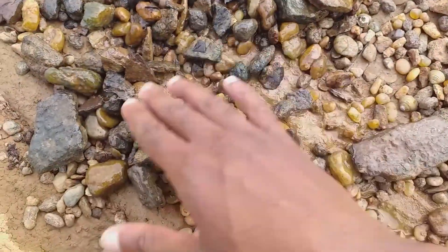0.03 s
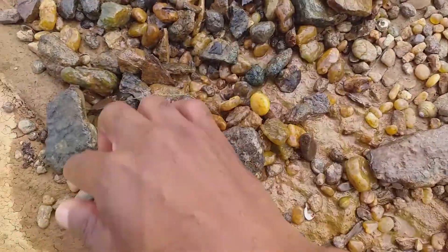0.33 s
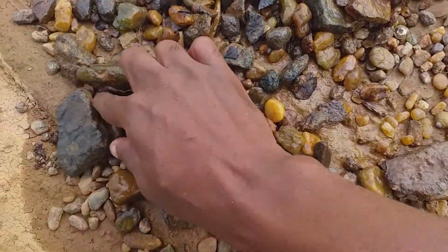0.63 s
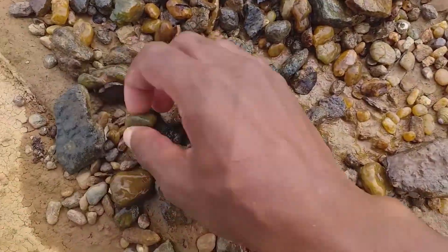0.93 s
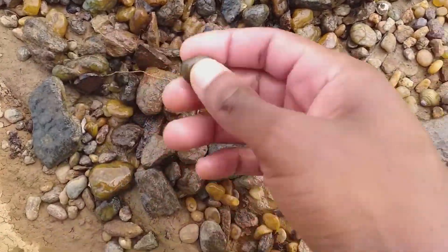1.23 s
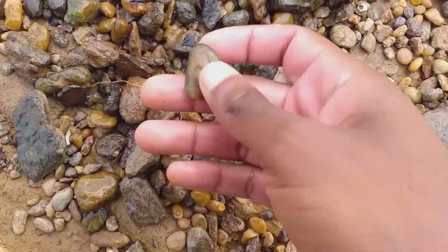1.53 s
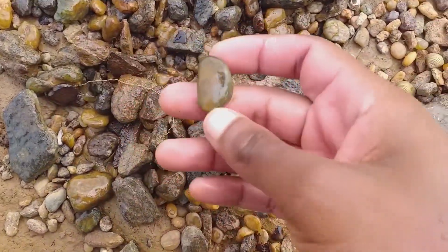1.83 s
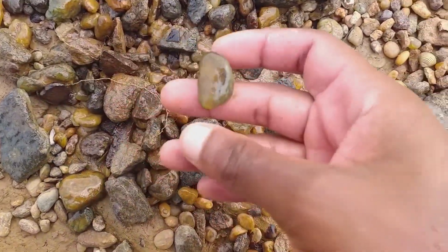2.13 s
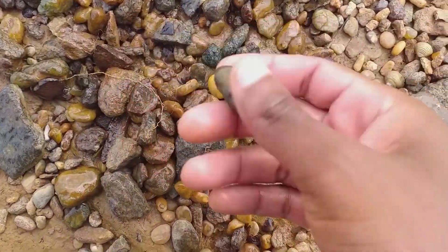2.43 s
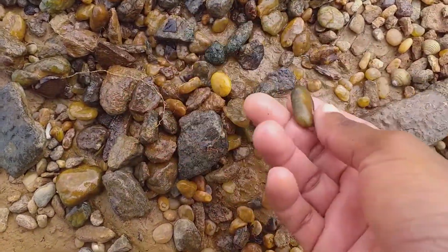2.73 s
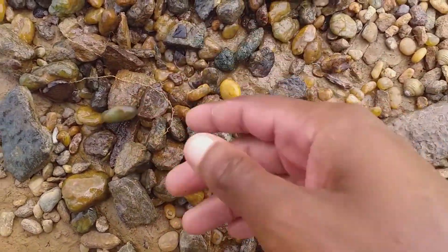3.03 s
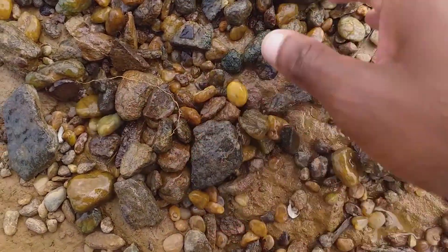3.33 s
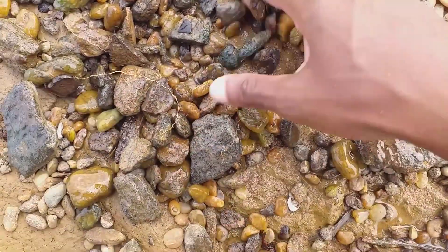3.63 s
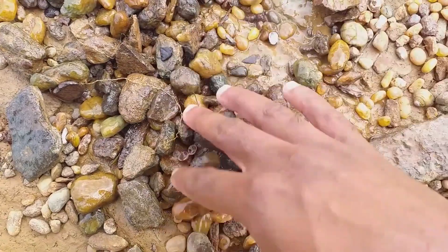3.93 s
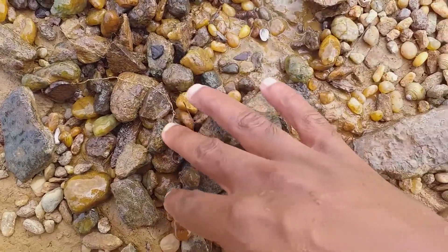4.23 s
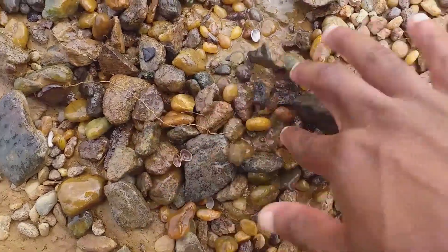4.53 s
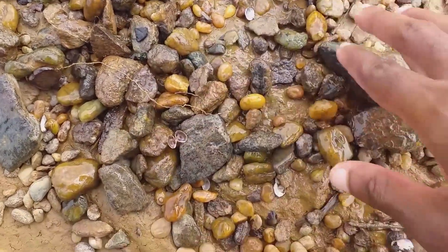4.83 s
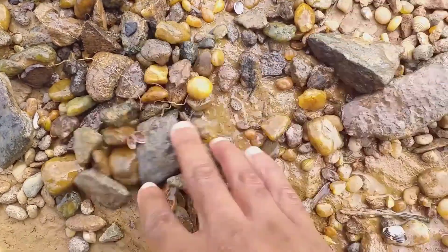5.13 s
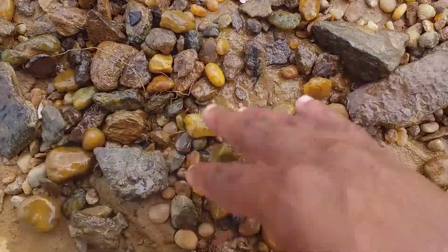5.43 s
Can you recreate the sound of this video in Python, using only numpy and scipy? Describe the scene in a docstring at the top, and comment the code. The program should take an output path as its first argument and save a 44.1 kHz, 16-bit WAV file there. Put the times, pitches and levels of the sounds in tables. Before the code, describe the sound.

Wet pebbles clack and crunch close by as a hand rakes through them in short bursts, with a faint river rushing behind.

```python
"""Wet pebbles clack and crunch close by as a hand rakes through them on a river bank.
The hand digs, picks one stone up, drops it and rakes three more times. Larger pebbles knock together
and tumble back, each with a very short, water-damped clack; grit crunches while the fingers push.
Under the stones sit soft thuds and wet rubs of the hand. Behind it all the river rushes steadily,
with a faint low hum far off."""
import sys
import numpy as np
from scipy import signal
from scipy.io import wavfile
from scipy.ndimage import uniform_filter1d

SR = 44100
rng = np.random.default_rng(int(sys.argv[2]) if len(sys.argv) > 2 else 0)


def generate_wav(signal):
    """Clip the signal to [-1, 1] and save it as 16-bit WAV at the path in sys.argv[1]."""
    frames = np.transpose(np.atleast_2d(signal))
    scaled = np.clip(frames, -1, 1) * 32767
    pcm = np.round(scaled).astype(np.int16)
    wavfile.write(sys.argv[1], SR, pcm)


N = 245637
HIT_SAMPLES = 2048
BODY_TOP_HZ, CRACK_LOW_HZ, TOP_HZ = 9000, 10000, 15900   # a hit has a body below and a crack on top


def from_db(db):
    return 10 ** (np.asarray(db) / 20)


def unit_rms(x):
    return x / np.sqrt(np.mean(x ** 2) + 1e-20)


def unit_energy(x):
    return x / np.sqrt(np.sum(x ** 2) + 1e-20)


def fader(points):
    """Gain at every sample from (time [s], level [dB]) points."""
    times, levels_db = np.transpose(points)
    return from_db(np.interp(np.arange(N) / SR, times, levels_db))


def db_at(spectrum, hz):
    """Read an EQ curve on a log-frequency axis."""
    freqs, levels_db = np.transpose(spectrum)
    return np.interp(np.log(hz), np.log(freqs), levels_db)


def butter(x, hz, kind, order=2):
    """A causal Butterworth filter."""
    sos = signal.butter(order, np.clip(hz, 10, .47 * SR), kind, fs=SR, output="sos")
    return signal.sosfilt(sos, x + 1e-18)


def drift(per_s):
    """A random modulator that glides between values of spread 1."""
    knots = rng.standard_normal(2048)
    return np.interp(np.arange(N) / SR * per_s, np.arange(len(knots)), knots)


def swells(rows):
    """An envelope of smooth, bell-shaped swells."""
    t = np.arange(N) / SR
    return sum(from_db(level_db) * np.exp(-((t - s) / half_s) ** 2) for s, half_s, level_db in rows)


def levelled(x, span_s=0.041):
    """Ride the gain so that the push sets the loudness and the grain stays."""
    power = np.maximum(uniform_filter1d(x ** 2, int(span_s * SR)), 0)
    return x / np.sqrt(power + .02 * np.mean(x ** 2))


def grains(per_s, spread_db=4):
    """Clicks at random moments: many small ones, a few large."""
    sizes = from_db(spread_db * np.minimum(rng.exponential(1, N), 4)) * rng.choice([-1, 1], N)
    return sizes * (rng.random(N) < per_s / SR)


def ring(hz, t60):
    """One struck mode dying away."""
    t = np.arange(HIT_SAMPLES) / SR
    return np.sin(2 * np.pi * hz * t) * from_db(-60 * t / t60)


def contact(scatter_db=-13, scatter_t60=0.029, far_db=-38, far_t60=0.0204):
    """One sharp impulse, then its dense scatter off the stones around and off the hand."""
    t = np.arange(HIT_SAMPLES) / SR
    fade = from_db(scatter_db - 60 * t / scatter_t60) + from_db(far_db - 60 * t / far_t60)
    pulse = fade * rng.standard_normal(HIT_SAMPLES)
    pulse[0] += 1
    return pulse


def crackle(per_s):
    """One contact sound, retriggered at random."""
    return signal.fftconvolve(grains(per_s), contact())[:N]


def far_hum(band_hz=(112, 124), level_db=-68):
    """A faint low hum far off, wavering as a narrow band of noise does."""
    return from_db(level_db) * unit_rms(butter(rng.standard_normal(N), band_hz, "band"))


# tone of the river: (frequency [Hz], relative density [dB])
RIVER_EQ = [(25, -33), (50, -19.5), (75, -14.5), (150, -5.5), (240, 0), (420, 0), (620, -6), (950, -4.5),
            (1500, -13), (2300, -15.5), (5000, -28), (8600, -56.5), (10000, -53), (16000, -35)]
# fader ride of the river: (time [s], level [dB])
RIVER_FADER = [(0, -46), (.75, -47.5), (1.35, -47), (1.6, -45.5), (2.0, -46.5), (2.8, -46), (5.57, -46)]
def river(swell_db=1.77, swells_per_s=12):
    """Far running water: a smooth rush whose third-octave bands each swell on their own."""
    edges_hz = 25 * 2 ** np.arange(0, 9.6, 1 / 3)
    white = rng.standard_normal((2, N))   # neighbouring bands take different noise
    rush = np.zeros(N)
    for k, (low, high) in enumerate(zip(edges_hz, edges_hz[1:])):
        band = butter(white[k % 2], [low, high], "band", order=3)
        rush += band * from_db(db_at(RIVER_EQ, np.sqrt(low * high)) + swell_db * drift(swells_per_s))
    return fader(RIVER_FADER) * unit_rms(rush)


# fader ride of the hiss off the palm: (time [s], level [dB])
PALM_FADER = [(0, -59), (1.1, -68), (1.5, -66), (2.0, -65), (2.9, -62.5), (3.3, -67), (5.57, -64.5)]
def palm_hiss(band_hz=(1600, 5000)):
    """The open palm throws back some of the river's hiss."""
    return fader(PALM_FADER) * unit_rms(butter(rng.standard_normal(N), band_hz, "band"))


# cues for the weight of the hand: (time [s], half-width [s], level [dB])
THUD_CUES = [(.3, .04, -64), (.5, 0.099, -59.5), (.95, 0.047, -58), (5.06, 0.068, -60)]
def hand_thuds(band_hz=(50, 100)):
    """The hand bears down on the bed with soft, low thuds."""
    return swells(THUD_CUES) * unit_rms(butter(rng.standard_normal(N), band_hz, "band"))


# cues for sliding skin: (time [s], half-width [s], level [dB])
RUB_CUES = [(.65, 0.3, -59), (1.72, .1, -79), (2.19, 0.033, -76), (2.5, 0.015, -68), (2.85, 0.086, -82.5),
            (4.34, 0.02, -54)]
def skin_rubs(band_hz=(5500, 9000), slips_per_s=700):
    """Wet skin slips over stone with a faint, bright crackle."""
    return swells(RUB_CUES) * unit_rms(butter(crackle(slips_per_s), band_hz, "band"))


# modes of a gripped stone: (frequency [Hz], relative level [dB], t60 [s])
GRIPPED_MODES = [(930, -4, 0.056), (1280, -1.5, 0.02), (1770, 3.5, 0.019), (2320, -8, 0.0084),
                 (4900, 2.5, 0.011)]
# cues for its taps: (time [s], gain [dB])
TAP_CUES = [(2.6475, -35.5), (4.528, -36)]
def held_stone(scuff_db=14, scuff_hz=(800, 5500)):
    """Dull taps of a stone in the fingers: a few skin-damped modes and a broad scuff."""
    modes = sum((-1) ** k * from_db(db) * ring(hz, t60) for k, (hz, db, t60) in enumerate(GRIPPED_MODES))
    out = np.zeros(N)
    for s, gain_db in TAP_CUES:
        at = round(s * SR)
        scuff = from_db(scuff_db) * unit_energy(butter(contact(), scuff_hz, "band"))
        out[at:at + HIT_SAMPLES] += from_db(gain_db) * (modes + scuff)
    return out


# bell filters of the microphone's tone: (centre [Hz], width [Hz], gain [dB])
MIC_EQ = [(1576, 350, 4), (2140, 250, -3.5), (2335, 220, 7.5), (2800, 430, 0.5), (3200, 210, 2.5),
          (5280, 61, 4), (8700, 460, -1.5)]
def mic_colour(x):
    """The microphone's tone colours the stones with a few narrow peaks and dips."""
    for hz, width_hz, gain_db in MIC_EQ:
        tuning = -2 * np.cos(2 * np.pi * hz / SR)
        half = np.pi * width_hz / SR
        lift = from_db(gain_db / 2)
        numerator = [1 + half * lift, tuning, 1 - half * lift]
        denominator = [1 + half / lift, tuning, 1 - half / lift]
        x = signal.lfilter(numerator, denominator, x)
    return x


def push_envelope(start, length, t60, attack_share=0.32):
    """Force builds up, holds to the end of the push, then the stones slide to rest."""
    t = np.arange(N) / SR - start
    attack = np.clip(t / (attack_share * length), 0, 1)
    return attack * from_db(-60 * np.maximum(t - length, 0) / t60)


# pushes of the fingers through the grit: (start [s], length [s], crunch level [dB], release t60 [s],
# crack re crunch [dB], send to the big stones [dB])
PUSH_CUES = [(0.06, .009, -31, .05, 5.5, -36), (0.079, .04, -27, .07, -9, -36),
             (0.456, 0.0188, -35, 0.029, -8, -32), (0.589, .025, -44, 0.17, -20, -25),
             (0.71, 0.096, -40.5, .1, -4, -28), (0.959, .02, -45.5, 0.056, 2, -30),
             (3.051, .03, -47, 0.57, -12, -32), (3.581, 0.18, -22.5, 0.68, -7, -20.5),
             (3.889, 0.044, -30, 0.2, -10, -21), (4.375, 0.074, -31.5, 0.53, -12.5, -18.5),
             (4.473, .05, -27.5, 0.51, -11, -20.5), (5.019, 0.038, -35.5, 0.087, -18, -25),
             (5.059, 0.059, -23.5, 0.45, -9, -25.5), (5.138, .052, -23.5, 0.11, -9, -29.5),
             (5.195, 0.055, -34, 0.042, 3.5, -26), (5.272, 0.033, -43.5, 0.069, -23, -32),
             (5.348, 0.031, -38, 0.066, -9, -29), (5.412, 0.014, -45, 0.035, -29, -22)]
def raking(creep_db=-26.5, creep_t60=0.88, creep_crack_db=-12):
    """Envelopes for crunch, crack and big stones; grit creeps on after each push, and all add in power."""
    power = np.zeros((3, N))
    for start, length, level_db, t60, crack_db, big_db in PUSH_CUES:
        push = from_db(level_db) * push_envelope(start, length, t60)
        creep = from_db(level_db + creep_db) * push_envelope(start, length, creep_t60)
        power += np.outer(from_db([0, crack_db, big_db]), push) ** 2
        power[:2] += np.outer(from_db([0, creep_crack_db]), creep) ** 2
    return np.sqrt(power)


def big_stones(push, count=8, knocks_per_s=60, band_hz=(1080, 2300), gain_db=1.5):
    """A few heavier stones shift underneath with duller knocks, each with a sound of its own."""
    knocks = sum(crackle(knocks_per_s) for _ in range(count))
    return from_db(gain_db) * push * levelled(butter(knocks, band_hz, "band", order=3))


# tone of the crunching grit: (frequency [Hz], relative density [dB])
GRIT_EQ = [(2400, -3), (3100, -9.5), (4200, 3.5), (6500, -3), (7900, 3.5)]
def grit_crunch(push, crack_push, peak_per_s=2400, sizes=28, band_ratio=1.295,
                ring_db=-5, ring_cycles=110, jerk_db=1.0):
    """Small stones of many sizes grind together in little jerks; a harder push makes more contacts."""
    clicks = grains(peak_per_s * (push / push.max()) ** 0.43)
    size_of_click = rng.integers(0, sizes, N)
    sharpness = from_db(3.9 * rng.standard_normal(N))   # edge or face, contact by contact
    body, crack = np.zeros((2, N + HIT_SAMPLES))
    for size, hz in enumerate(np.geomspace(2450, 8000, sizes)):
        pulse = contact()
        stone = unit_energy(butter(pulse, [hz / band_ratio, hz * band_ratio], "band"))
        stone += from_db(ring_db) * unit_energy(ring(hz, ring_cycles / hz))
        stone *= from_db(db_at(GRIT_EQ, hz)) * np.sqrt(hz / 2400)   # higher stones cover a wider band
        edge = butter(pulse, [CRACK_LOW_HZ, TOP_HZ], "band", order=3)
        for at in np.flatnonzero((size_of_click == size) & (clicks != 0)):
            body[at:at + HIT_SAMPLES] += clicks[at] * stone
            crack[at:at + HIT_SAMPLES] += clicks[at] * sharpness[at] * edge
    body = butter(body[:N], BODY_TOP_HZ, "low", order=12)
    body = butter(body, 2600, "high", order=6)
    jerks = from_db(jerk_db * drift(per_s=160))
    return jerks * (push * levelled(body) + crack_push * levelled(crack[:N]))


def clack(hz, crack_db, band_ratio=1.417, ring_db=-8, ring_t60=0.014):
    """A shorter contact sounds higher; gaps between the stones ring briefly; sharp edges add a crack."""
    pulse = contact(scatter_db=-15, scatter_t60=0.014, far_db=-41.5)
    gaps = sum(ring(hz * 2 ** octaves, ring_t60) for octaves in rng.uniform(-0.324, 0.45, 3))
    body = unit_energy(butter(pulse, [hz / band_ratio, hz * band_ratio], "band"))
    body += from_db(ring_db) * unit_energy(gaps)
    body = butter(body, BODY_TOP_HZ, "low", order=8)
    body = butter(body, 0.15 * hz, "high", order=3)
    crack = butter(pulse, [CRACK_LOW_HZ, TOP_HZ], "band", order=3)
    return unit_energy(body) + from_db(crack_db) * unit_energy(crack)


def knock(hz, crack_db, graze_db=-22, max_graze_s=0.005, rock_db=-9, max_rock_s=.0022):
    """A pebble grazes a neighbour, lands and rocks onto a second point: (delay [s], sound) per touch."""
    before, after = rng.uniform(.2, 1, 2)
    touches = ((-max_graze_s * before, graze_db), (0, 0), (max_rock_s * after, rock_db))
    makeup = np.sqrt(.005 * SR)   # unit energy becomes unit RMS over 5 ms
    return [(delay_s, from_db(db) * makeup * clack(hz, crack_db)) for delay_s, db in touches]


def topple_cues(per_s=69, settle_s=0.14, level_db=-51.5, spread_db=3, pitch_hz=5200, spread_octaves=.25):
    """Faint knock cues: loose pebbles topple behind the fingers, thinning out as the bed settles."""
    cues = []
    for start, length, *_ in PUSH_CUES:
        moments = start + np.cumsum(rng.exponential(1 / per_s, size=40))
        topples = rng.random(40) > (moments - start - length) / settle_s
        levels_db = level_db + spread_db * rng.standard_normal(40)
        octaves = spread_octaves * rng.standard_normal(40)
        cracks_db = -10 + 18 * octaves   # a shorter contact is higher and cracks more
        cues.extend(np.column_stack([moments, levels_db, pitch_hz * 2 ** octaves, cracks_db])[topples])
    return cues


# featured knocks of pebble on pebble: (time [s], relative level [dB], pitch [Hz], crack re body [dB])
KNOCK_CUES = [(0.104, -18, 6360, -3.5), (0.1235, -13.5, 6370, -12), (0.142, -27, 6700, -11),
              (0.157, -27.5, 7250, -3), (0.1737, -25.5, 7300, -0.5), (0.197, -26.5, 7600, -4),
              (0.206, -30.5, 6540, -15), (0.2147, -33.5, 4330, -8), (0.2604, -38.5, 7000, 1.5),
              (0.3009, -39, 5160, -8), (0.3155, -36.5, 5940, 2.5), (0.4904, -31.5, 7440, 1.5),
              (0.5575, -39, 5620, -19), (0.5847, -22.5, 5330, -13.5), (0.6195, -30.5, 7200, -2.5),
              (0.6641, -30.5, 3620, -12), (0.732, -26.5, 5780, -5.5), (0.7827, -35.5, 6530, 3),
              (0.816, -27, 5970, -2.5), (0.8941, -32, 5800, -6.5), (1.071, -54, 4900, -16),
              (3.044, -41, 4010, -19.5), (3.062, -21.5, 5700, -21), (3.073, -25, 5560, -9),
              (3.1038, -35, 4360, -18), (3.1127, -36, 5600, -0.5), (3.1326, -37, 5840, -3),
              (3.165, -39.5, 4900, -12), (3.5862, -31, 4850, -17), (3.6588, -19.5, 4870, -2.5),
              (3.686, -19.5, 5300, -2), (3.717, -23.5, 6150, 0), (3.808, -19, 6050, -4),
              (3.819, -22.5, 6000, 0.5), (3.8597, -21.5, 4700, -20), (3.877, -20, 6700, -8),
              (3.9761, -28.5, 4040, -7), (3.9919, -29, 5260, -7), (4.0138, -27.5, 4540, -24),
              (4.0285, -25, 8100, -5.5), (4.0643, -32, 4400, -23), (4.1075, -27.5, 6200, -11),
              (4.1125, -28, 5330, -7.5), (4.2473, -41.5, 4500, -24), (4.3125, -32, 4340, -32),
              (4.451, -23.5, 5630, -9.5), (4.4876, -22, 5200, -7), (4.502, -14.5, 7000, -7),
              (4.5255, -30, 5200, 1), (4.5496, -25.5, 6100, -6), (4.6014, -26.5, 4800, -5),
              (4.6742, -21.5, 7900, -11), (4.7054, -32.5, 5060, -2), (4.75, -40, 6200, -5),
              (4.7827, -39, 5300, -11), (4.8125, -37, 5430, -22), (4.8582, -40, 5050, -16.5),
              (5.0315, -22.5, 5020, -10.5), (5.083, -19.5, 5120, -19), (5.1658, -18, 6430, -18),
              (5.1873, -20.5, 6070, 0), (5.282, -24.5, 7200, -4.5), (5.3369, -27.5, 5100, -15),
              (5.3765, -23, 6700, -1.5)]
def pebbles(cues, trim_db=-2):
    """Wet pebbles strike each other, one knock on each cue."""
    out = np.zeros(N + HIT_SAMPLES)
    for s, level_db, hz, crack_db in cues:
        for delay_s, sound in knock(hz, crack_db):
            at = min(round((s + delay_s) * SR), N)
            out[at:at + HIT_SAMPLES] += from_db(level_db + trim_db) * sound
    return out[:N]


def scene():
    """Stones and hand up front, the river behind; mono, open air, no reverb."""
    push, crack_push, deep_push = raking()
    hand = held_stone() + hand_thuds() + skin_rubs()
    ambience = river() + palm_hiss() + far_hum()
    stones = pebbles(KNOCK_CUES) + grit_crunch(push, crack_push)
    stones += big_stones(deep_push) + pebbles(topple_cues())
    return (ambience + hand + mic_colour(stones))[None]


def record(dry):
    """Master EQ: roll off the deepest bass and cut the very top steeply."""
    top_cut = signal.ellip(10, .2, 70, TOP_HZ, fs=SR, output="sos")
    return signal.sosfilt(top_cut, butter(dry, 40, "high"))


dry = scene()
out = record(dry)
generate_wav(out)
```